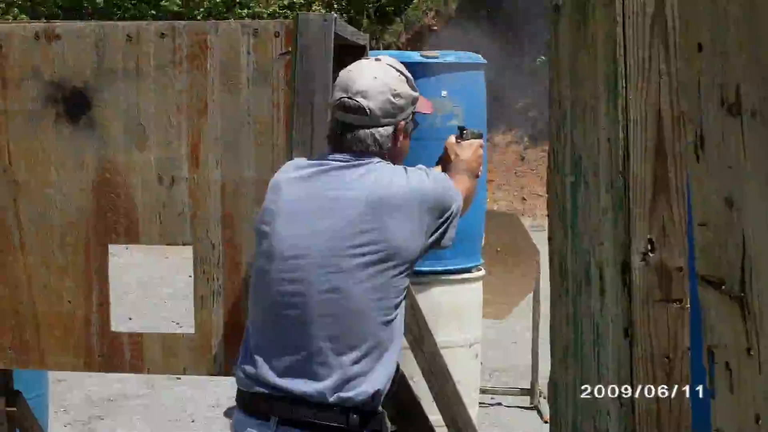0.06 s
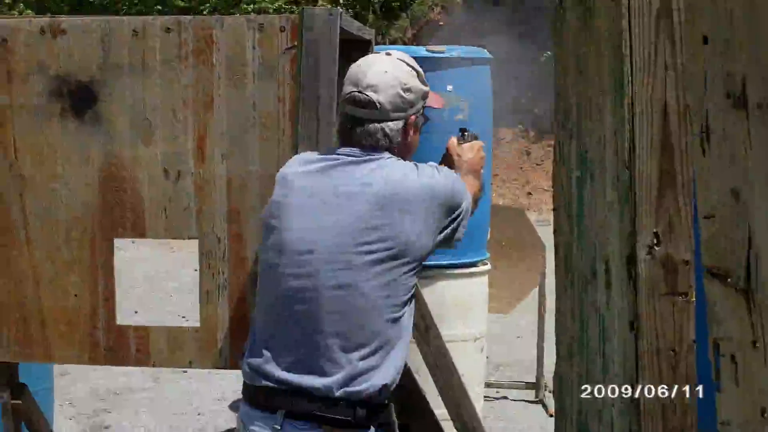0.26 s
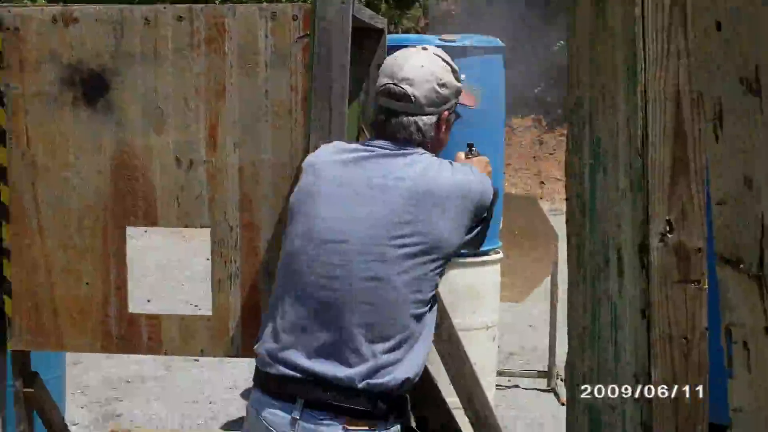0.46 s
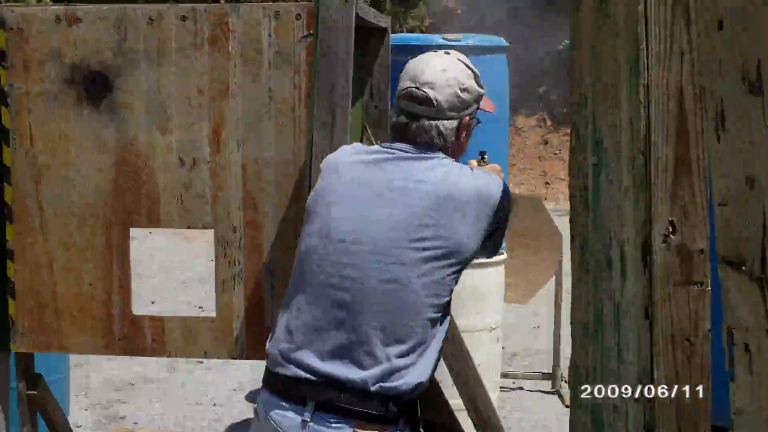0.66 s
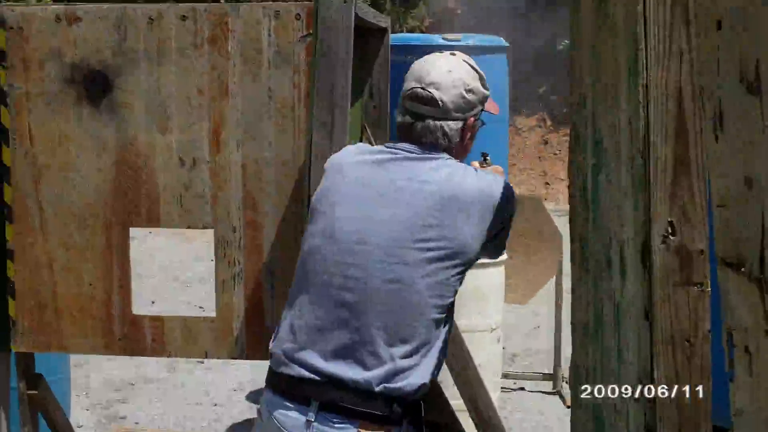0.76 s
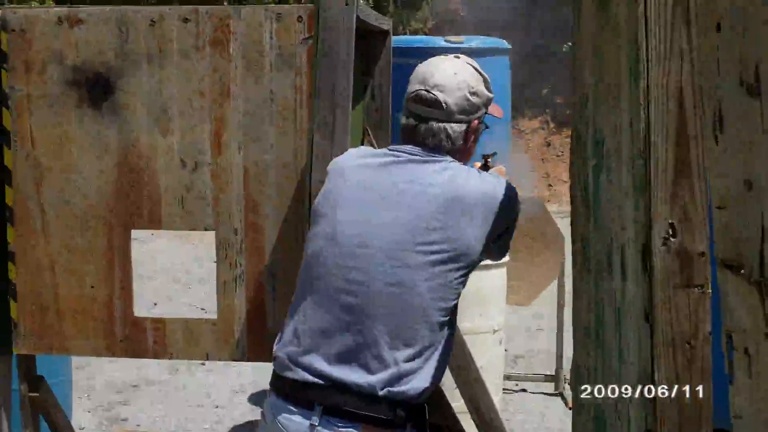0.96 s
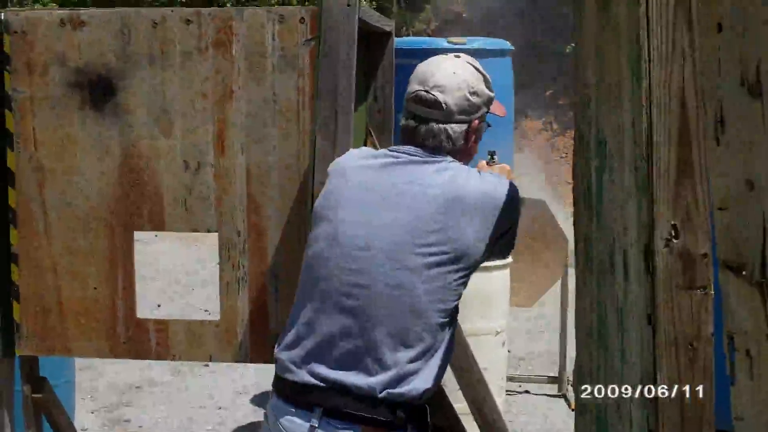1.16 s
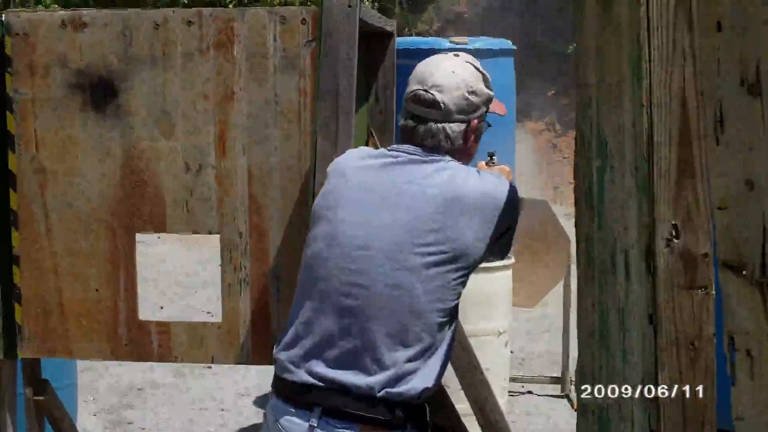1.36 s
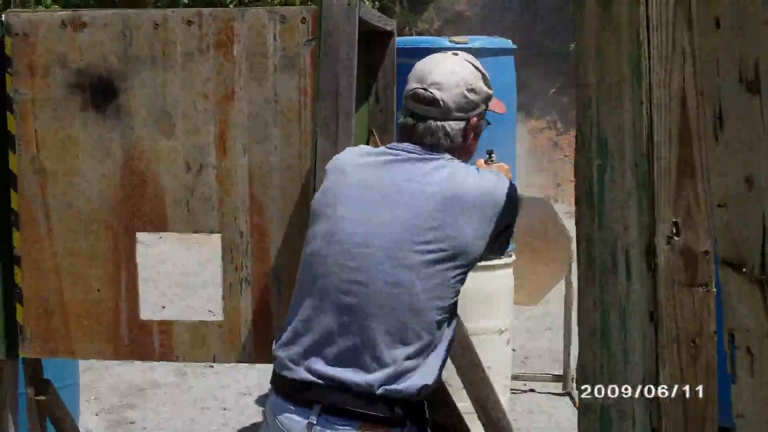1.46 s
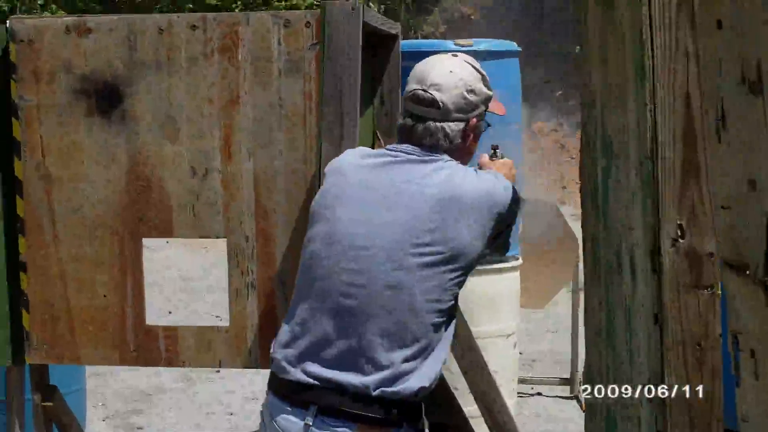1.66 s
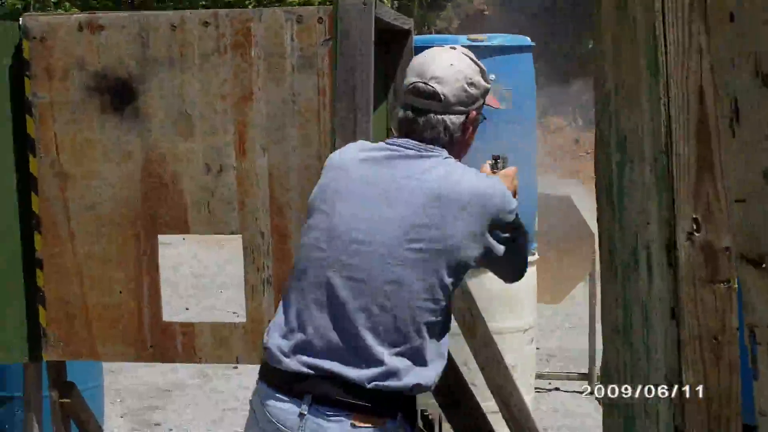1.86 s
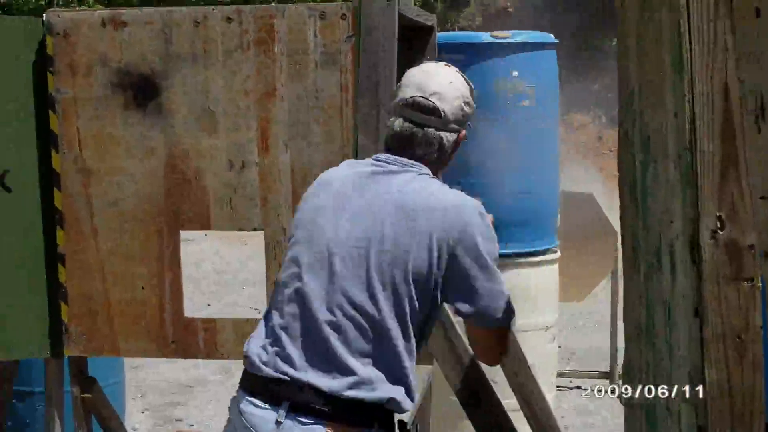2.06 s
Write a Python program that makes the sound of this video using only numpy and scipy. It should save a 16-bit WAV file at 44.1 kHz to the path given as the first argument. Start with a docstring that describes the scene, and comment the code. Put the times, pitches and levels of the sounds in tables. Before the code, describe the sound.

A handgun fires three times in an open-air bay of plywood walls, after a previous shot's dying echo. Each bang clips the nearby microphone, slaps, rings hollow and fades; a spent case ticks faintly after the first.

```python
"""Under an open-air hush an earlier pistol shot dies away; then three more are fired in a bay of plywood walls.
Each is a thin crack and a pressure pulse, on a slow offset swing that sags, rebounds and settles.
Noise echoes rattle between the near walls, ring in the bay and return ever duller from banks and trees;
the shots share part of one echo pattern. Between the first and second of the three come a soft low puff
and the faint noise ticks of a spent case landing. Loud peaks overload the microphone."""
import sys
import numpy as np
from scipy import signal
from scipy.io import wavfile

SR = 44100
rng = np.random.default_rng(int(sys.argv[2]) if len(sys.argv) > 2 else 0)


def unload_audio(sound):
    """Save the sound as a 16-bit wav file, at the path given as the first command line argument."""
    columns = np.transpose(np.atleast_2d(sound))
    # keep every value between -1 and 1, then stretch to whole-number steps
    steps = np.round(np.clip(columns, -1, 1) * 32767)
    wavfile.write(sys.argv[1], SR, steps.astype(np.int16))


def volts_from_decibels(level):
    """Turn decibel levels (scalar or array-like) into linear amplitude factors."""
    exponent = np.asarray(level, float) / 20
    return 10 ** exponent


N = 92610
LEAD = SR // 2  # samples computed ahead of the audible start
SINCE_START = np.arange(N + LEAD) / SR  # s; also the delay after a shot
T = SINCE_START - LEAD / SR  # s; 0 at the audible start
CRACK_S = 0.0012

# Pistol shots. Each row: start in seconds, strength in dB, share of the common echo pattern (0-1),
# offset swing in dB, delay of the blast after the start in seconds.
SHOTS = [(-.33, -2, 0.96, -0.5, .002), (.2066, -1, 0.49, -1, 0.0024), (1.0733, -1.5, 0.89, -4, 0.0016),
         (1.7123, -1, 0.89, -1, 0.0057)]


def at_hz(points, hz):
    """Interpolates a table of (Hz, value) on a log-frequency axis."""
    points_hz, values = np.transpose(points)
    return np.interp(np.log(hz), np.log(points_hz), values)


def cut(x, hz, kind, order=2):
    """Butterworth filter."""
    return signal.sosfilt(signal.butter(order, hz, kind, fs=SR, output="sos"), x)


def bands(rows):
    """Third-octave noise bands with their centres in Hz; neighbours come from unrelated noise."""
    white = rng.standard_normal((2, rows, N + LEAD))
    edges_hz = 22 * 2 ** (np.arange(30) / 3)
    return [(np.sqrt(low * high), cut(white[k % 2], [low, high], "band"))
            for k, (low, high) in enumerate(zip(edges_hz, edges_hz[1:]))]


def loudness(spectrum):
    """Rms of white noise coloured by a spectrum."""
    gains = volts_from_decibels(at_hz(spectrum, np.linspace(35, SR / 2, 2000)))
    return np.sqrt(np.mean(gains ** 2))


def hump(t, peak_s, sharpness):
    """Envelope that rises to 1 at peak_s and falls away."""
    return (t / peak_s * np.exp(1 - t / peak_s)) ** sharpness


def hush():
    """Steady open-air noise, coloured band by band."""
    level_db = -46.5
    # Hush spectrum. Each row: frequency in Hz, relative density in dB per Hz.
    spectrum = [(18, -32), (30, 4.5), (97, -13), (552, 2.5), (1300, -5.5), (1690, -27), (3320, -22.5),
                (11600, -43.5), (15000, -59)]
    noise_sum = sum(volts_from_decibels(at_hz(spectrum, hz)) * noise[0] for hz, noise in bands(1))
    return volts_from_decibels(level_db) * noise_sum / loudness(spectrum)


def crack():
    """Thin band of noise that swells ahead of the blast and dies."""
    level_db, low_hz, high_hz = 4, 600, 10000
    hiss = cut(rng.standard_normal(N + LEAD), [low_hz, high_hz], "band")
    swell = (SINCE_START / CRACK_S) ** 2 * np.exp(-SINCE_START / CRACK_S)
    return volts_from_decibels(level_db) * hiss * swell


def blast(delay_s):
    """Pressure pulse: a positive half, then a weaker, longer suction."""
    level_db, positive_s, damping = 20, 0.003, 1.89
    after = np.maximum(SINCE_START - delay_s, 0) / positive_s
    return volts_from_decibels(level_db) * (SINCE_START > delay_s) * (1 - after) * np.exp(-damping * after)


def offset_swing():
    """Slow offset swing after each shot: sags, rebounds and settles."""
    dip_s, dip_db, dip_sharpness = 0.08, -16, 8.0
    rebound_s, rebound_db, settle_s = 0.17, -21, 0.2
    t = SINCE_START
    rebound = (1 - np.exp(-(t / rebound_s) ** 4)) * np.exp(-t / settle_s)
    return volts_from_decibels(rebound_db) * rebound - volts_from_decibels(dip_db) * hump(t, dip_s, dip_sharpness)


def resonances(rows):
    """Boom of the plywood walls and hollow ring of the bay, as noise in resonances."""
    boom_hz, boom_db, boom_t60_s = [152.3, 336], 3, 0.2
    ring_sharpness = 3.08
    # Hollow rings. Each row: frequency in Hz, width in Hz, relative level in dB, delay of the peak in seconds.
    rings = [(520, 72, -35.5, 0.21), (850, 65, -40, .3), (1276, 56, -30, 0.1)]
    white = rng.standard_normal((rows, N + LEAD))
    boom = cut(white, boom_hz, "band")
    out = boom / boom.std() * volts_from_decibels(boom_db - 60 * SINCE_START / boom_t60_s)
    for hz, width_hz, db, peak_s in rings:
        ring = signal.lfilter(*signal.iirpeak(hz, hz / width_hz, fs=SR), white)
        out = out + ring / ring.std() * volts_from_decibels(db) * hump(SINCE_START, peak_s, ring_sharpness)
    return out


def tail_swell_db():
    """Swells and dips of the far tail at set delays, plus slow random lumps."""
    width_s, lumps_db, lumps_hz = 0.018, 2.5, 40
    # Swells and dips. Each row: delay in seconds, low-frequency level change in dB (negative dips).
    swells = [(.13, 2.5), (.19, -1.5), (0.228, 2), (.285, -2.5), (.315, -5), (0.402, 3), (.42, -0.5),
              (.53, 1.5)]
    swell_db = sum(db * np.exp(-0.5 * ((SINCE_START - s) / width_s) ** 2) for s, db in swells)
    lumps = cut(rng.standard_normal(N + LEAD), lumps_hz, "low")
    return swell_db + lumps_db * lumps / lumps.std()


def echoes():
    """Decaying noise bands; rows: the common echo pattern, then one own pattern per shot."""
    walls_db, walls_hold_s = 6.5, 0.017
    banks_db, banks_at_s = -34, 0.39  # relative level at that delay
    swell_top_hz, rise_s = 1800, 0.003
    # Near and far echo spectra. Each row: frequency in Hz, relative density in dB per Hz.
    walls = [(29, -39), (50, -1), (120, -38.5), (250, -9.5), (480, -1), (850, 1), (1350, -4.5), (1650, -10),
             (2100, -10.5), (2940, -11), (5000, -21.5), (8840, -26), (15300, -29)]
    banks = [(29, -38.5), (50, -27.5), (108, -18), (191, -23.5), (267, -9), (511, -3), (886, -1),
             (1350, -3), (1750, -10.5), (2900, -8.5), (4200, -16.5), (6000, -29), (8840, -37.5),
             (15300, -88)]
    # Near and far decay. Each row: frequency in Hz, time to fall by 60 dB in seconds.
    walls_t60 = [(60, 0.089), (250, 0.15), (700, 0.24), (2000, 0.17), (3500, 0.27), (6000, 0.39),
                 (12000, 0.31)]
    banks_t60 = [(60, 0.55), (250, 1), (700, 1.8), (2000, 1.54), (5000, 0.87), (12000, 0.27)]

    t, rows = SINCE_START, len(SHOTS) + 1
    swell_db = tail_swell_db()
    out = resonances(rows)
    for hz, noise in bands(rows):
        walls_fall_db = 60 * np.maximum(t - walls_hold_s, 0) / at_hz(walls_t60, hz)
        near = volts_from_decibels(walls_db + at_hz(walls, hz) - walls_fall_db) / loudness(walls)
        banks_fall_db = 60 * (t - banks_at_s) / at_hz(banks_t60, hz)
        far = volts_from_decibels(banks_db + at_hz(banks, hz) - banks_fall_db) / loudness(banks)
        far = far * volts_from_decibels(swell_db / (1 + (hz / swell_top_hz) ** 2))
        out = out + noise * np.hypot(near, far)
    return out * (1 - np.exp(-np.maximum(t - CRACK_S, 0) / rise_s))


def hollow_returns():
    """Pitched returns from the hollow bay: short swelling sines in the common echo pattern."""
    # Pitched returns. Each row: delay in seconds, frequency in Hz, relative level in dB,
    # half-length (Gaussian sigma) in seconds.
    tones = [(0.214, 510, -27, 0.007), (0.235, 105, -43.5, 0.011), (0.328, 87, -43, 0.0086),
             (0.288, 850, -32.5, 0.021), (0.306, 520, -31.5, 0.0098), (0.327, 525, -31.5, 0.0096),
             (0.423, 880, -41.5, 0.017)]
    out = np.zeros(N + LEAD)
    for delay_s, hz, db, half_s in tones:
        envelope = np.exp(-0.5 * ((SINCE_START - delay_s) / half_s) ** 2)
        phase = rng.uniform(0, 2 * np.pi)
        out += volts_from_decibels(db) * envelope * np.sin(2 * np.pi * hz * SINCE_START + phase)
    return out


def pistol():
    """Sums crack, blast, offset swing and echoes for every shot."""
    tails, swing, out = echoes(), offset_swing(), np.zeros(N + LEAD)
    tails[0] += hollow_returns()
    for k, (start_s, db, common, swing_db, blast_delay_s) in enumerate(SHOTS):
        # Power-preserving mix of common and own pattern.
        tail = common * tails[0] + np.sqrt(1 - common ** 2) * tails[k + 1]
        sound = crack() + blast(blast_delay_s) + volts_from_decibels(swing_db) * swing + tail
        start = int(start_s * SR) + LEAD
        out[start:] += volts_from_decibels(db) * sound[:N + LEAD - start]
    return out


def puff():
    """Soft low gust on the microphone: low-passed noise in a Gaussian swell."""
    centre_s, sigma_s, level_db, top_hz = 0.81, 0.019, -50, 120
    noise = cut(rng.standard_normal(len(T)), top_hz, "low")
    return volts_from_decibels(level_db) * noise / noise.std() * np.exp(-0.5 * ((T - centre_s) / sigma_s) ** 2)


def case_ticks():
    """Faint ticks of a spent case landing: decaying bursts of high noise."""
    decay_s, low_hz, high_hz = 0.0045, 6300, 11600
    # Ticks. Each row: start in seconds, initial gain on the noise in dB.
    ticks = [(.922, -57), (.935, -68), (.947, -58), (.957, -63), (.98, -68)]
    envelope = sum(volts_from_decibels(db) * (T > s) * np.exp(-np.maximum(T - s, 0) / decay_s) for s, db in ticks)
    return envelope * cut(rng.standard_normal(len(T)), [low_hz, high_hz], "band")


def scene():
    """Shots, puff and ticks over the open-air hush, from the audible start."""
    mix = hush() + pistol() + puff() + case_ticks()
    return mix[None, LEAD:]


def overload(x):
    """Microphone overload: a smooth knee into a fixed ceiling."""
    ceiling, knee = 0.95, 12
    return x / (1 + np.abs(x / ceiling) ** knee) ** (1 / knee)


def recorder_response(x):
    """Treble roll-off, narrow dips and steep band limit of the recorder."""
    roll_hz, limit_hz = 10650, 15280
    # Dips. Each row: frequency in Hz, width in Hz, depth (0-1).
    dips = [(7860, 850, 0.8), (11140, 210, .8)]
    x = cut(x, roll_hz, "low")
    for hz, width_hz, depth in dips:
        x = x - depth * signal.lfilter(*signal.iirpeak(hz, hz / width_hz, fs=SR), x)
    band_limit = signal.ellip(10, 0.2, 60, limit_hz, fs=SR, output="sos")  # ripple, stopband in dB
    return signal.sosfilt(band_limit, x)


def top_cut(x):
    """Nothing passes above the cut-off."""
    return signal.sosfilt(signal.butter(12, 15480, fs=SR, output="sos"), x)


def record(dry):
    """Microphone overload, then the recorder's response."""
    finished = recorder_response(overload(dry))
    return top_cut(finished)


dry = scene()
out = record(dry)
unload_audio(out)
```